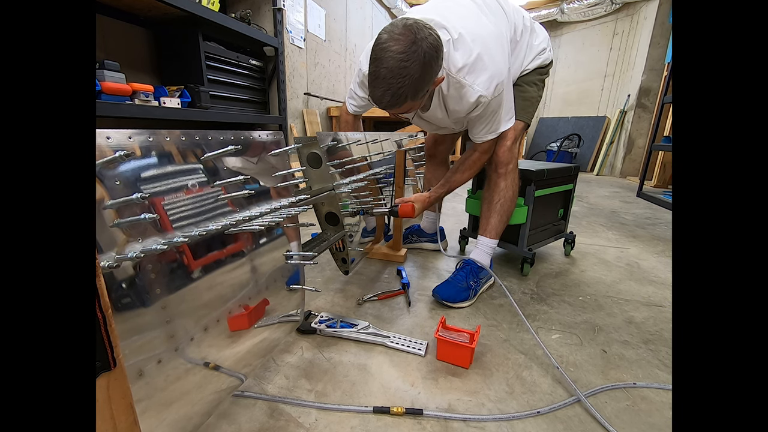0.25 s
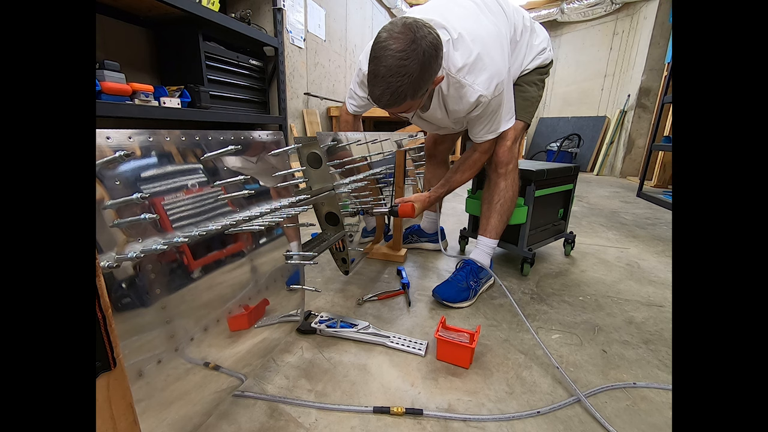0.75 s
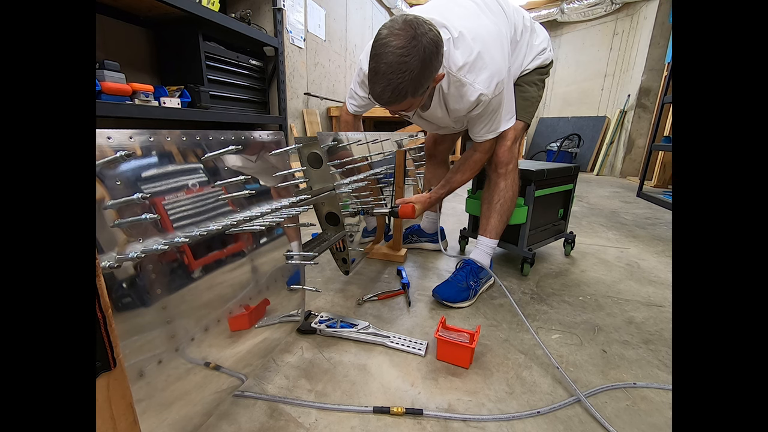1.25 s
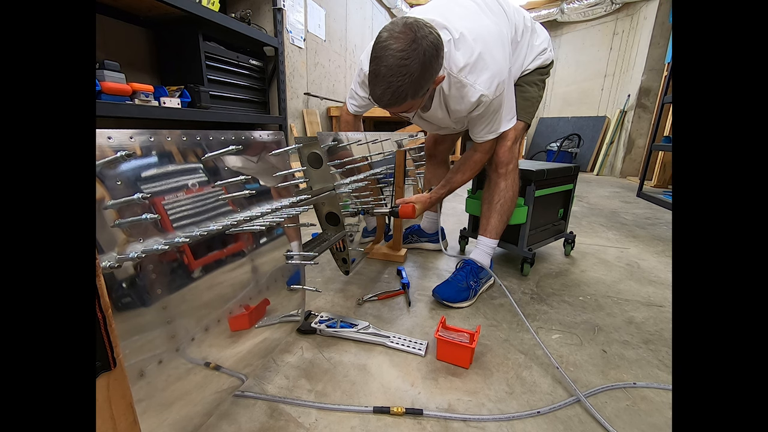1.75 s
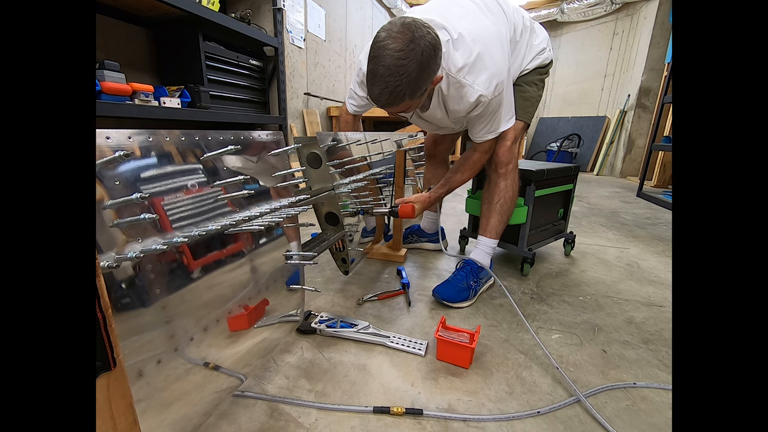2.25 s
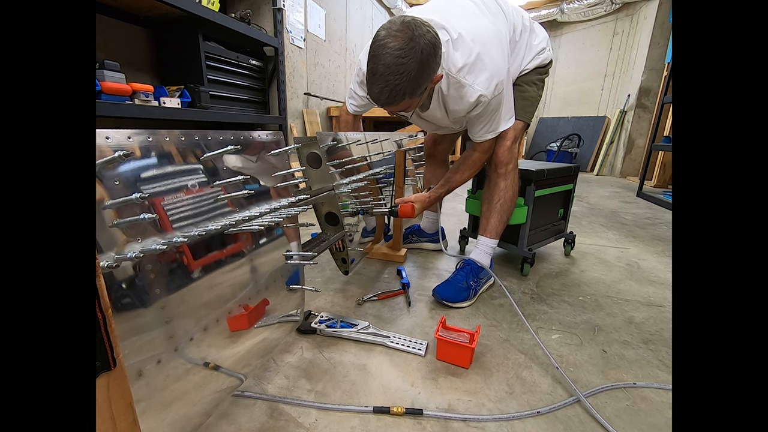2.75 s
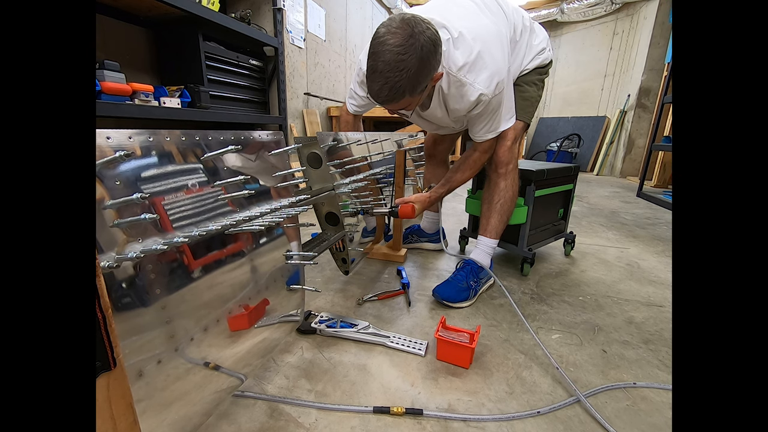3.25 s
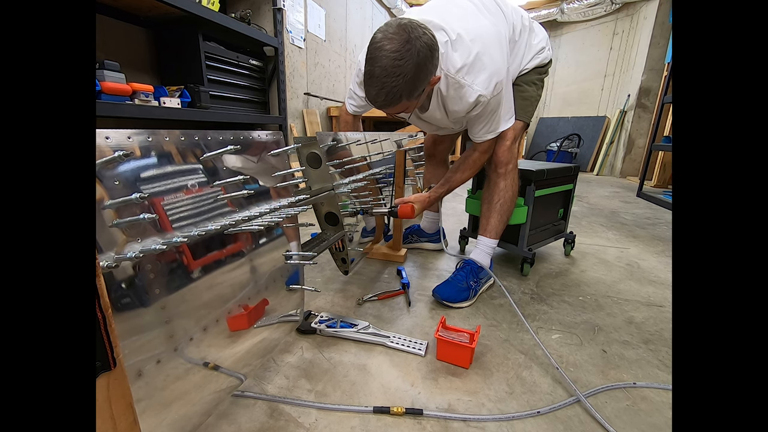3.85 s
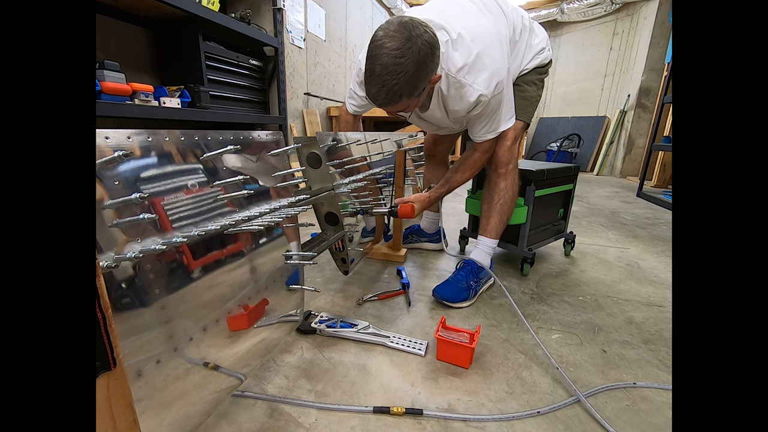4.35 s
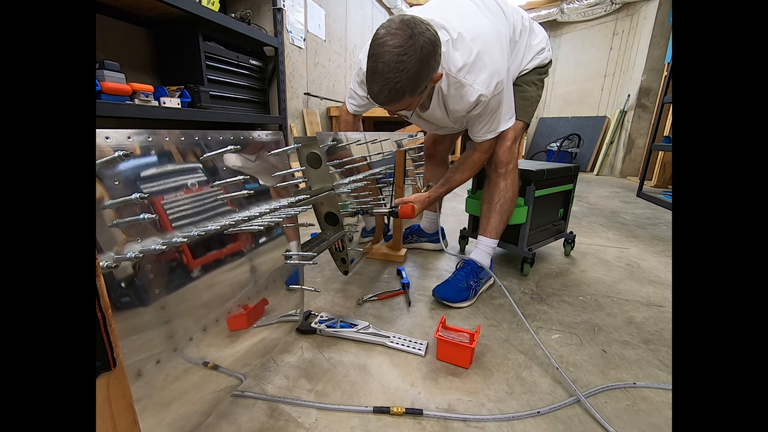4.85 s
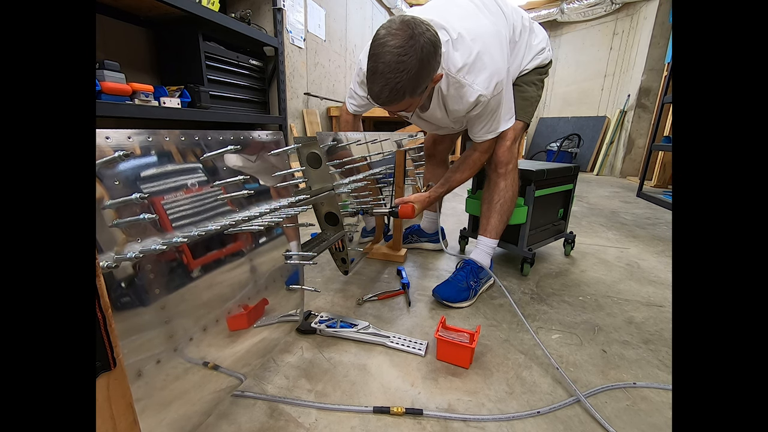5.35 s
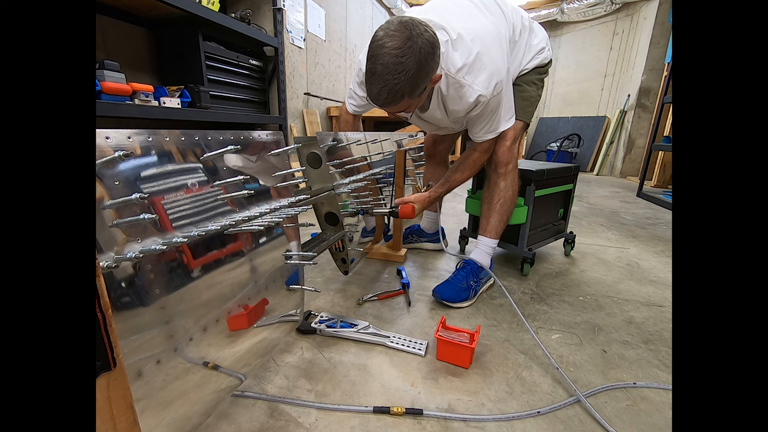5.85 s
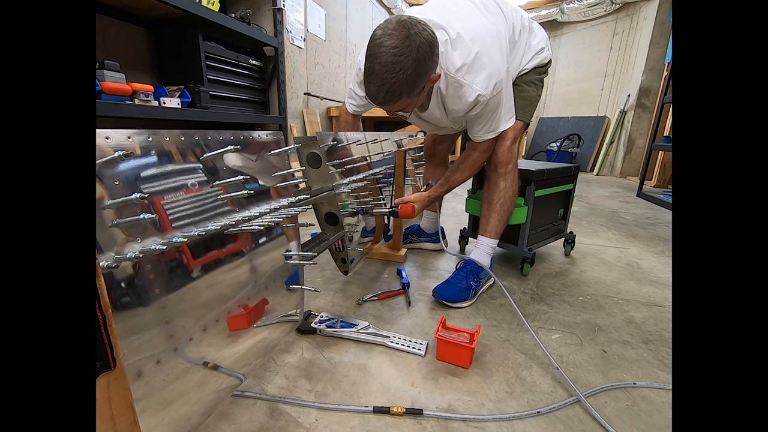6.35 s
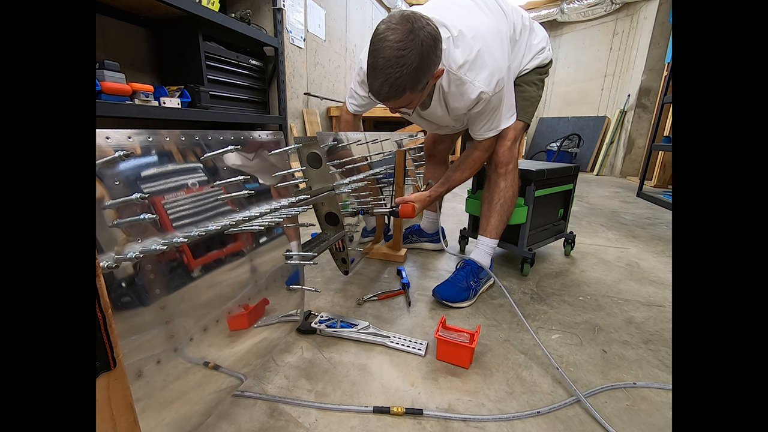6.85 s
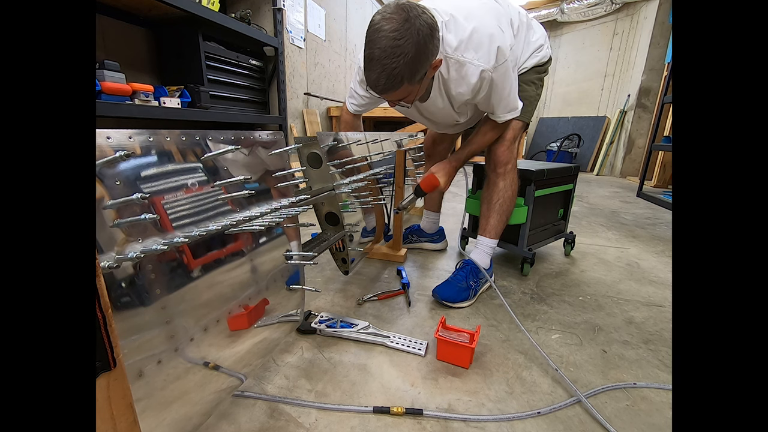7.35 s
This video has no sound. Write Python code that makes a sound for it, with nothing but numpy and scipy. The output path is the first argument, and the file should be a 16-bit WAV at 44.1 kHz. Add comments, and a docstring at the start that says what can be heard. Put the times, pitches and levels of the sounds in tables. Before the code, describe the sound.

An air rivet gun hammers four rapid, ringing bursts into a thin metal panel in a garage, over a low fan drone.

```python
"""Four bursts of hard, fast hammering ring through a garage: an air rivet gun on a thin metal wing panel.
Each blow is a noise crack with chattering steel, a low boom of the panel and a ring of the steel bucking bar.
Before each burst the trigger valve hisses and squeaks and the gun makes weak strokes; tools tap and cloth rustles.
A fan drones behind with a thin leak of air; random echoes make the room.
A gain control turns everything down during loud hammering and slowly back up."""
import sys
import numpy as np
from scipy import signal
from scipy.fft import rfft, irfft
from scipy.io import wavfile
from scipy.ndimage import uniform_filter1d

SR = 44100
rng = np.random.default_rng(int(sys.argv[2]) if len(sys.argv) > 2 else 0)


def unload_wav(signal):
    """Save mono or channel-first audio to the path in sys.argv[1] as 16-bit WAV at rate SR, clipped to [-1, 1]."""
    wavfile.write(
        sys.argv[1],
        SR,
        np.round(np.clip(np.atleast_2d(signal).T, -1, 1) * 32767).astype(np.int16),
    )


N = 335160  # length [samples]

# pulls of the trigger: (valve opens [s], hiss level [dB], bar ring at the first blow [dB],
# blows as (time [s], crack level [dB]))
TRIGGER_PULLS = [ (.73, -64, -36, [(0.8765, -4.5), (0.926, -9), (0.9746, -9.5)]),
                 (2.57, -66, -37, [(2.7058, -7), (2.7533, -10.5), (2.8026, -9.5), (2.8533, -10.5),
                 (2.901, -8), (2.9506, -9), (2.9999, -8), (3.065, -10.5)]), (4.2, -72, -36.5, [(4.339, -9),
                 (4.3861, -9.5), (4.4344, -9.5), (4.483, -10), (4.5319, -9.5), (4.581, -10), (4.6292, -9),
                 (4.678, -8.5), (4.7273, -9.5), (4.776, -7.5), (4.8268, -6)]),
                 (6.39, -72.5, -26.5, [(6.4932, -6.5), (6.5401, -8.5), (6.5887, -9.5), (6.6373, -9),
                 (6.6862, -7)]), ]
# colour of the crack and of the escaping air: (frequency [Hz], relative level [dB per Hz])
CRACK_COLOUR = [(530, -24), (900, -3), (1760, -7), (3230, -3.5), (3830, 0.5), (5130, 0), (7950, -1),
                (9540, -4.5), (11300, -22), (14300, -33), (16500, -43.5)]


def amp(db):
    """Turns decibels into a gain."""
    return 10 ** (np.asarray(db) / 20)


def unit(x):
    """Scales a sound to an average (rms) level of 1."""
    return x / np.sqrt(np.mean(x ** 2) + 1e-20)


def read(points, hz):
    """Reads a table between its points, on a log-frequency axis."""
    f, value = np.transpose(points)
    return np.interp(np.log(hz + 1), np.log(f + 1), value)


def add(mix, s, sound):
    """Mixes a sound in at s seconds, cutting off what runs past the end."""
    part = mix[..., round(s * SR):][..., :sound.shape[-1]]
    part += sound[..., :part.shape[-1]]


def resonate(x, hz, width):
    """Resonance that follows the curve hz: shift that pitch down to zero, smooth, shift back up."""
    turn = np.exp(2j * np.pi * np.cumsum(hz * np.ones(len(x))) / SR)
    r = np.exp(-np.pi * width / SR)
    smooth = signal.lfilter([1 - r], [1, -r], x / turn + 1e-18)
    return 2 * (turn * smooth).real


def hiss(spectrum, size):
    """Noise of the given colour, scaled to rms 1."""
    gain = amp(read(spectrum, np.fft.rfftfreq(size, 1 / SR)))
    return unit(irfft(rfft(rng.standard_normal(size)) * gain, size))


def ring(modes, t, scatter_db, detune=0):
    """A struck object: dying sine tones, whose levels and pitches can vary a little from blow to blow."""
    hz, db, t60 = np.transpose(modes)[:, :, None]
    db = db + scatter_db * rng.standard_normal(db.shape)
    hz = hz * (1 + detune * rng.standard_normal(hz.shape))
    return (amp(db - 60 * t / t60) * np.sin(2 * np.pi * hz * t)).sum(0)


def pair(same, frames, size):
    """Random short-time spectra for two channels, as alike as the table says."""
    hz = np.fft.rfftfreq(size, 1 / SR)
    a, b, c, d = rng.standard_normal((frames, len(hz), 4)).T
    like = np.clip(read(same, hz), -1, 1)[:, None]
    left = a + 1j * b
    right = like * left + np.sqrt(1 - like ** 2) * (c + 1j * d)
    return hz, np.array([left, right])


def gun():
    """Each blow cracks, rattles loose clamps, makes steel chatter and knocks the stand; bar and panel stay apart."""
    # panel on its stand: (frequency [Hz], level [dB], t60 [s])
    panel_modes = [(39.75, -23.5, 0.15), (65, -15.5, .2), (86.5, 1.5, 0.16), (84.9, -26.5, 1.3),
                   (102, -6.5, 0.08), (114.5, -22, 1.9), (122.1, -9.5, 0.24), (125.9, -25.5, 1.5),
                   (164, -12, 0.26), (180.6, -14.5, 0.18), (193.4, -21.5, 1)]
    # wooden stand and ribs: (frequency [Hz], level [dB], t60 [s])
    stand_modes = [(226, -1.5, 0.17), (253, -1.5, 0.13), (290, -11, 0.044), (334.5, -2, 0.24),
                   (362, -6.5, 0.19), (399, -13, 0.44), (477, -8.5, 0.033), (734, -10.5, 0.37),
                   (819, -11.5, 0.23)]
    # the gun set (the striking tool) itself: (frequency [Hz], level [dB], t60 [s])
    set_modes = [(7940, -4.5, 0.015), (7060, -10, 0.023), (5540, -17, 0.015), (4400, -18.5, .012)]
    # chattering gun set and sheet: (frequency [Hz], width [Hz], level [dB])
    steel_bands = [(2230, 43, 3.5), (2785, 140, -0.5), (2610, 360, -13), (3440, 77, -16), (3520, 78, -5.5),
                   (4530, 110, -10.5), (5460, 90, -9.5), (7915, 140, 0), (9770, 150, -7.5)]
    # colour of the rattling: (frequency [Hz], relative level [dB per Hz])
    rattle_colour = [(150, -33.5), (250, 0), (809, -12), (1030, -13.5), (1630, -9), (2320, -10.5),
                     (2860, -4.5), (3180, -8), (8180, -31.5), (9920, -18), (11600, -46.5), (14300, -45.5),
                     (16500, -76.5)]
    # one row per burst: (first stand knock [dB], clamps shivering on [dB], their bright ring [dB])
    seats = [(-24.5, -41, -55.5), (-26, -41.5, -58), (-24.5, -56, -56.5), (-26, -39, -35)]
    bar_hz, bar_t60 = 7307, 0.14  # Hz, s
    bar_grows_db = 2  # each blow seats the rivet harder and the bar rings louder
    stand_settles_db = 1.9  # the stand knocks most at first and settles with each blow
    sheet_db, first_clank_db = -16, 7.5  # clank of the sheet, extra at the first blow
    landing_db = 3  # random scatter from blow to blow
    alike = 0.9  # blows on one rivet excite the steel in nearly the same way (0-1)
    differ = np.sqrt(1 - alike ** 2)
    shiver_t60, clamp_t60 = 0.97, 0.5  # s
    clamp_hz, clamp_width_hz = 5460, 450

    out, bar, panel = np.zeros((3, N))
    t = np.arange(SR) / SR
    short = t[:SR // 5]
    size = len(short)
    for (_, _, first_bar_db, blows), (stand_db, shiver_db, clamp_db) in zip(TRIGGER_PULLS, seats):
        seat_crack = hiss(CRACK_COLOUR, size)
        seat_chatter = rng.standard_normal(size)
        for k, (s, crack_db) in enumerate(blows):
            knock_db, clank_db, bar_db = landing_db * rng.standard_normal(3) + (
                stand_db - stand_settles_db * k,
                sheet_db + first_clank_db * (k == 0),
                first_bar_db + bar_grows_db * k)

            # a very short spike on top of a longer crack
            fade = amp(-60 * short / 0.059) + 0.68 * amp(-60 * short / 0.0043)
            crack = alike * seat_crack + differ * hiss(CRACK_COLOUR, size)
            crack = crack * fade * np.minimum(short / 0.00031, 1)
            rattle = hiss(rattle_colour, size) * amp(-60 * short / 0.23) * np.minimum(short / 0.0037, 1)
            chatter = alike * seat_chatter + differ * rng.standard_normal(size)
            chatter = chatter * amp(-60 * short / 0.017)
            steel = sum(amp(db) * resonate(chatter, hz, width) for hz, width, db in steel_bands)
            ping = ring(set_modes, short, scatter_db=1.8, detune=0.004) * np.minimum(short / 0.0012, 1)
            sheet = resonate(rng.standard_normal(size), 900, width=310) * amp(clank_db - 60 * short / 0.081)
            stand = -ring(stand_modes, short, scatter_db=3.0, detune=0.0013) * amp(knock_db)
            blow = amp(-7.0) * crack + amp(-14.5) * rattle + amp(2.5) * steel + ping
            add(out, s, amp(crack_db) * blow + sheet + stand)

            # the bar sings once it has bounced clear
            bar_tone = np.sin(2 * np.pi * bar_hz * short) * amp(bar_db - 60 * short / bar_t60)
            add(bar, s + 0.0027, bar_tone * (1 - np.exp(-short / 0.0008)))

            clamps = unit(resonate(rng.standard_normal(len(t)), clamp_hz, clamp_width_hz))
            shiver = hiss(rattle_colour, len(t)) * amp(shiver_db - 60 * t / shiver_t60)
            add(out, s, shiver + amp(clamp_db - 60 * t / clamp_t60) * clamps)

            # the heavy panel is slow to swing up; cracks weaker than -10 dB come with a weaker boom
            thump_db = -10.5 + 4 * min(crack_db + 10, 0)
            boom = -ring(panel_modes, t, scatter_db=3.0) * amp(thump_db)
            add(panel, s + 0.0035, boom * (1 - np.exp(-t / 0.0055)))
    return out, bar, panel


def trigger():
    """The valve opens: hissing, squeaking air, and weak strokes before the piston runs freely."""
    # weak first strokes and valve snaps:
    # (time [s], snap level [dB], low push level [dB], knock level [dB], snap pitch [Hz])
    strokes = [(0.7696, -32, -15.5, -40, 6350), (0.8185, -21.5, -37.5, -29, 4332),
               (0.8456, -39, -22.5, -17.5, 4220), (0.8596, -18, -4.5, -6.5, 6720),
               (2.5897, -52, -37, -47.5, 4000), (2.61, -29, -23.5, -31.5, 6430),
               (2.6476, -19.5, -21, -18.5, 6760), (2.6752, -51, -25.5, -5.5, 6450),
               (2.6884, -19.5, -7.5, -13.5, 6550), (4.317, -29, -20.5, -14, 6100),
               (4.3322, -17.5, -5, -12, 6200), (6.427, -32.5, -23.5, -40.5, 6710),
               (6.4419, -16, -15.5, -6, 6540), (6.4746, -19, -4, 2, 6680)]
    # squeaks and thin whistles of air: (time [s], length [s], first pitch [Hz], last pitch [Hz], level [dB])
    squeaks = [(0.785, 0.032, 6100, 6960, -51.5), (.819, 0.014, 4400, 4300, -41.5),
               (0.823, .028, 7650, 8750, -48), (4.225, 0.084, 7700, 8100, -65),
               (4.23, 0.081, 4280, 4200, -66), (4.245, .048, 5500, 6800, -63),
               (6.445, 0.014, 6600, 6600, -43.5), (2.646, 0.0099, 4400, 4170, -32),
               (7.106, 0.22, 2830, 2800, -68)]
    stroke_rise_s = 0.0017
    surge_db, surge_s = 9, 0.025  # the hiss surges just before the first full blow

    out, t = np.zeros(N), np.arange(SR // 8) / SR
    for s, snap_db, push_db, knock_db, hz in strokes:
        whistle = resonate(resonate(rng.standard_normal(len(t)), hz, width=290), hz, width=900)
        snap = (0.97 * hiss(CRACK_COLOUR, len(t)) + 3.2 * whistle) * amp(snap_db - 60 * t / 0.034)
        push = np.sin(2 * np.pi * 150 * t) * amp(push_db - 60 * t / 0.016)
        knock = np.sin(2 * np.pi * 1100 * t) * amp(knock_db - 60 * t / 0.0039)
        add(out, s, (snap + push + knock) * np.minimum(t / stroke_rise_s, 1))

    for opens, hiss_db, _, blows in TRIGGER_PULLS:
        t = np.arange(opens - blows[0][0], 0, 1 / SR)  # counts up to 0 at the first blow
        swell = amp(hiss_db + surge_db * np.exp(t / surge_s))
        add(out, opens, hiss(CRACK_COLOUR, len(t)) * swell * signal.windows.tukey(len(t), 0.1))

    for s, length, first_hz, last_hz, db in squeaks:
        hz = np.linspace(first_hz, last_hz, round(length * SR))
        squeak = resonate(resonate(rng.standard_normal(len(hz)), hz, width=240), hz, width=170)
        add(out, s, amp(db) * unit(squeak) * signal.windows.tukey(len(hz), 0.5))
    return out


def handling():
    """Taps of band-limited noise, one hard clack (a short tone plus noise), and a soft rustle."""
    # small taps and scuffs of tools and hose:
    # (time [s], starting level [dB], centre [Hz], width [octaves], t60 [s])
    taps = [(2.1505, -53.5, 1810, 0.81, 0.14), (4.1994, -57, 2863, 0.77, 0.035),
            (5.7045, -54, 1500, 1.25, .1), (7.0933, -52.5, 7840, 0.33, 0.072),
            (7.482, -45.5, 900, 0.52, 0.078), (7.523, -62, 5000, .5, 0.044)]
    # colour of a tool laid down on something hard: (frequency [Hz], relative level [dB per Hz])
    clack_colour = [(240, -41), (400, 0), (1130, -3), (1760, 3), (2510, -9), (3380, -4), (5640, -18.5),
                    (6150, -15), (6990, -30), (8770, -25), (12000, -55), (15600, -90), (22000, -120)]
    # clothes and hose rustle as the worker straightens up: (time [s], level [dB])
    rustle_levels = [(6.85, -55), (7.142, -54), (7.3, -63), (7.6, -68)]
    # colour of the rustle: (frequency [Hz], relative level [dB per Hz])
    rustle_colour = [(290, -20), (500, -4), (653, 4), (1440, -6), (2720, -11.5), (3940, -18), (10500, -35),
                     (13600, -74), (22000, -120)]
    clack_s, clack_db = 7.4555, -18

    out, t = np.zeros(N), np.arange(SR // 8) / SR
    f = np.fft.rfftfreq(len(t), 1 / SR) + 1
    for s, db, hz, octaves, t60 in taps:
        band = np.exp(-0.5 * (np.log2(f / hz) / octaves) ** 2)
        grit = irfft(rfft(rng.standard_normal(len(t))) * band, len(t))
        add(out, s, unit(grit) * amp(db - 60 * t / max(t60, 0.005)))

    tone = ring([(1400, 0, 0.006)], t, scatter_db=0)
    fade = amp(-60 * t / 0.033) + 0.15 * amp(-60 * t / 0.14)
    clack = tone + 0.39 * hiss(clack_colour, len(t)) * fade
    add(out, clack_s, amp(clack_db) * clack * np.minimum(t / 0.00046, 1))

    s, level_db = np.transpose(rustle_levels)
    t = np.arange(s[0], s[-1], 1 / SR)
    rustle = hiss(rustle_colour, len(t)) * amp(np.interp(t, s, level_db))
    add(out, s[0], rustle * np.minimum((t - s[0]) / 0.092, 1))
    return out


def garage(x):
    """Dense random echoes, each band dying at its own speed, from three tails that fade in and out in turn."""
    # how long the room rings: (frequency [Hz], t60 [s])
    band_t60 = [(60, 2.4), (160, 0.7), (420, 0.96), (1100, 0.76), (2900, 0.32), (7700, 0.38), (14000, 0.32)]
    # how alike the echoes are left and right: (frequency [Hz], likeness [-1 to 1])
    echo_likeness = [(60, 0.92), (180, 1), (550, 0.87), (1650, 1), (4970, -0.053), (15000, -1)]
    # slow tail from far corners: (frequency [Hz], level against the main echoes [dB])
    late_level = [(100, -43.5), (500, -38), (1200, -36), (2800, -35), (4000, -47.5), (9000, -50.5)]
    late_t60 = 2.7  # s

    out, t = np.zeros((2, N)), np.arange(N) / SR
    for k in range(3):
        hz, z = pair(echo_likeness, SR // 88, size=512)
        age = np.arange(z.shape[2]) * 128 / SR
        early = amp(-60 * age / read(band_t60, hz)[:, None])
        late = amp(read(late_level, hz)[:, None] - 60 * age / late_t60)
        tail = signal.istft(z * (early + late), nperseg=512, noverlap=384)[1]
        # walls answer after a few ms
        tail = tail * np.clip((np.arange(tail.shape[1]) / SR - 0.004) / 0.011, 0, 1)
        # the three shares always add up to the same power
        share = np.sqrt(2 / 3) * np.cos(2 * np.pi * (1.7 * t + k / 3))
        out += signal.fftconvolve((x * share)[None], tail / np.linalg.norm(tail[0]), axes=1)[:, :N]
    return out


def fan():
    """Motor tones of wavering pitch and level in a soft, patchy wash of air noise."""
    # motor tones: (frequency [Hz], level [dB])
    motor_tones = [(59.2, -48), (102.3, -41.5), (290.7, -67)]
    # colour of the wash: (frequency [Hz], relative level [dB per Hz])
    air_colour = [(15, -18), (30, -11.5), (60, 2), (90, -13), (110, 1.5), (140, -11), (290, -11),
                  (430, -20), (800, -15.5), (970, -22), (2500, -31), (6150, -46), (10000, -55.5),
                  (11000, -78.5)]
    # how alike the wash is left and right: (frequency [Hz], likeness [-1 to 1])
    air_likeness = [(60, 1.0), (150, 0.96), (380, 0.95), (950, 0.21), (2380, 0.41), (5980, 0.03),
                    (15000, 0.13)]
    air_db = -49

    hz, z = pair(air_likeness, N // 512 + 5, size=2048)
    # random level patches, smoothed over frequency and then over time
    patches = rng.standard_normal(z.shape[:0:-1]).T
    patches = unit(uniform_filter1d(uniform_filter1d(patches, 12, 0), 8, 1))
    z = z * amp(read(air_colour, hz)[:, None] + 2.5 * patches)
    wash = signal.istft(z, nperseg=2048, noverlap=1536)[1][:, :N]
    out = amp(air_db) * unit(wash)
    for tone_hz, db in motor_tones:
        # slow random curves for pitch and level
        drift = unit(resonate(rng.standard_normal(N), 0, width=6.5))
        swell = unit(resonate(rng.standard_normal(N), 0, width=6.5))
        tone = np.sin(2 * np.pi * np.cumsum(tone_hz + 1.2 * drift) / SR)
        out = out + np.sqrt(2) * amp(db + 0.89 * swell) * tone
    return out


def hose():
    """A thin leak of air at a coupling: band-limited noise, unrelated left and right."""
    leak_db = -78
    band = signal.butter(4, [4500.0, 9800.0], "band", fs=SR, output="sos")
    return unit(signal.sosfilt(band, rng.standard_normal((2, N)))) * amp(leak_db)


def scene():
    """Leans the gun between left and right by frequency, then adds floor bounce, room, fan and leak."""
    # how much louder the gun is on the left: (frequency [Hz], left over right [dB])
    lean_table = [(60, 1.5), (180, -1), (550, 0.5), (1650, 3), (4970, 1), (15000, 7.5)]
    # bounce off the floor, left row then right row: (delay [s], level [dB])
    floor_echo = [(.0021, -14.5), (.0026, -8.5)]

    blows, bar, panel = gun()
    tool = blows + trigger()
    hands = handling()
    hz = np.fft.rfftfreq(N, 1 / SR)
    lean = amp(np.outer([0.5, -0.5], read(lean_table, hz)))
    near = irfft(rfft(tool + bar) * lean, N) + panel + hands
    bright = signal.sosfilt(signal.butter(2, 350.0, "high", fs=SR, output="sos"), tool)
    for side, (delay, db) in zip(near, floor_echo):
        add(side, delay, amp(db) * bright)

    to_room = tool + amp(-18.5) * bar + amp(-7.0) * panel + amp(-8.5) * hands
    weak_bass = 1 / (1 + (200 / (hz + 1)) ** 2)  # the room answers the lowest boom weakly
    wet = garage(irfft(rfft(to_room) * weak_bass, N))
    return near + amp(-2.5) * wet + fan() + hose()


def record(dry):
    """The microphone drops deep bass; gain sinks in loud passages and creeps back; peaks clip, top treble goes."""
    dry = signal.sosfilt(signal.butter(3, 40.0, "high", fs=SR, output="sos"), dry)
    power_db = 10 * np.log10(abs(uniform_filter1d((dry ** 2).mean(0), 4000)) + 1e-12)
    # the longer the burst, the deeper the gain sinks (0.6 s smoothing of the level above -31 dB)
    slow = np.exp(-1 / (0.6 * SR))
    sink_db = 0.41 * signal.lfilter([1 - slow], [1, -slow], np.maximum(power_db + 31, 0))
    # hold the deepest sink so far and let it recover by 1.8 dB a second
    climb = np.arange(N) * 1.8 / SR
    ducked = dry / amp(np.maximum.accumulate(sink_db + climb) - climb)
    lowpass = signal.firwin(511, 16750, window=("kaiser", 9), fs=SR)
    return signal.oaconvolve(np.clip(ducked, -1, 1), lowpass[None], "same")


dry = scene()
out = record(dry)
unload_wav(out)
```